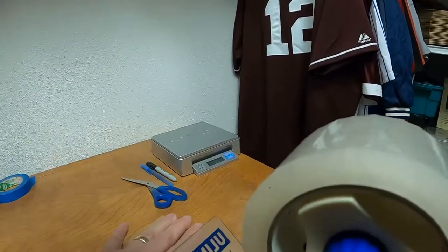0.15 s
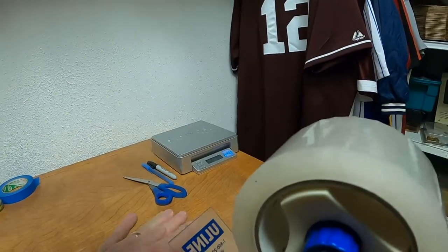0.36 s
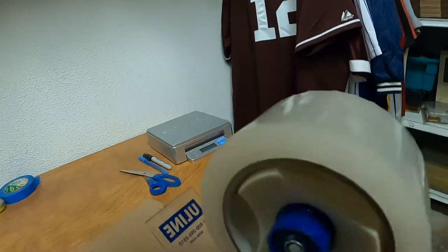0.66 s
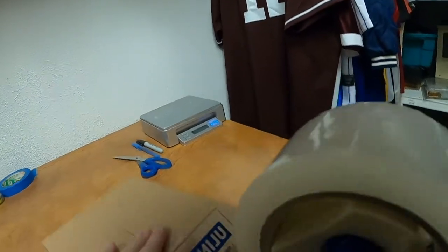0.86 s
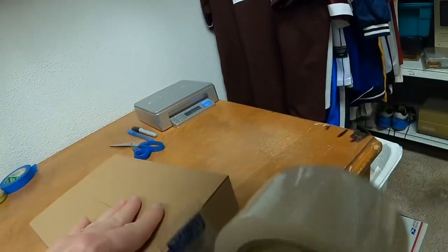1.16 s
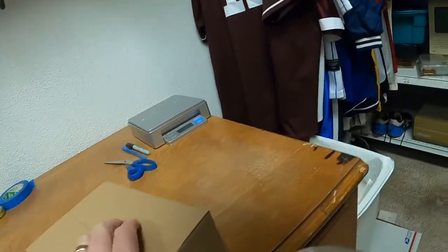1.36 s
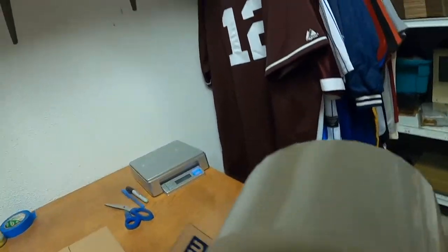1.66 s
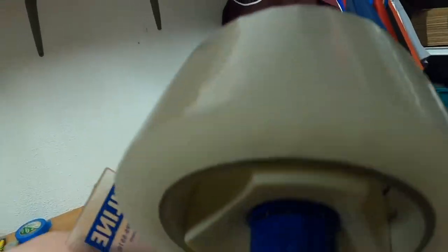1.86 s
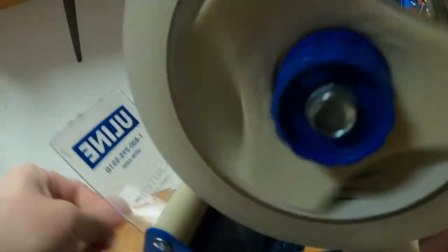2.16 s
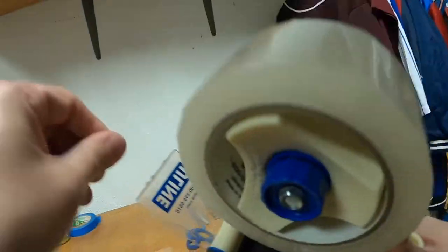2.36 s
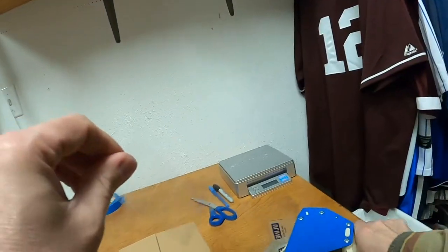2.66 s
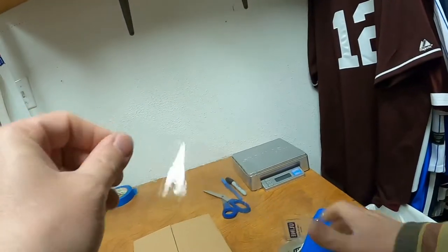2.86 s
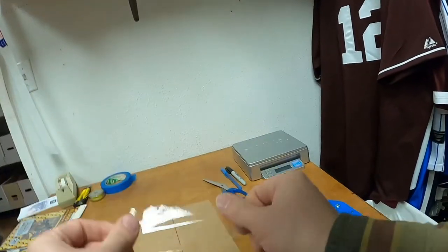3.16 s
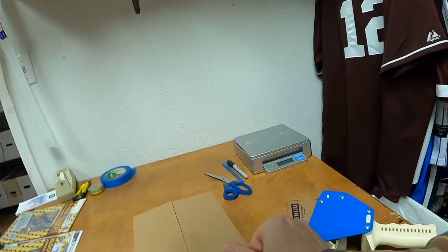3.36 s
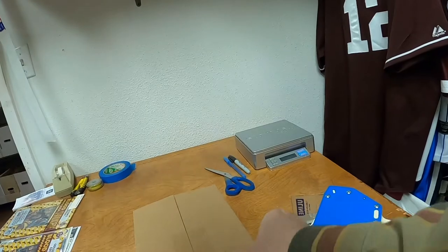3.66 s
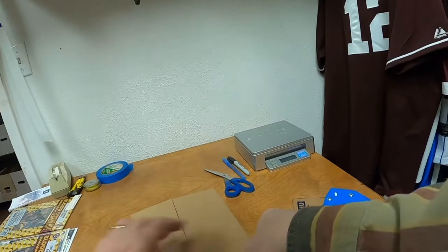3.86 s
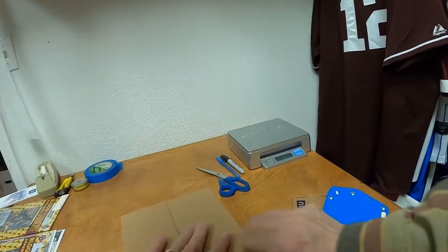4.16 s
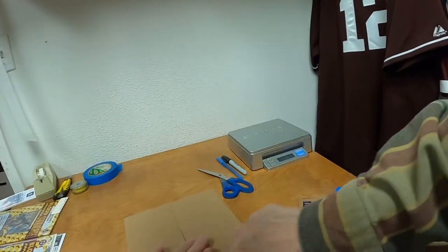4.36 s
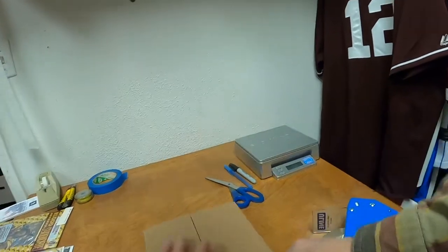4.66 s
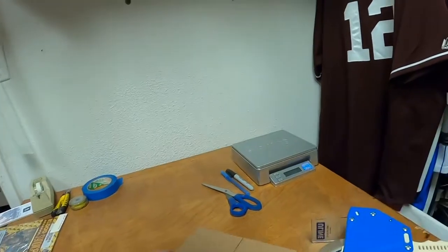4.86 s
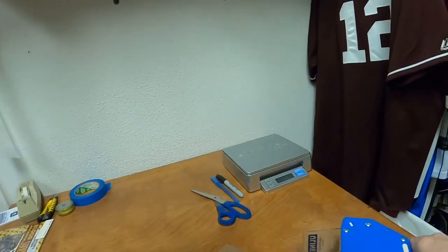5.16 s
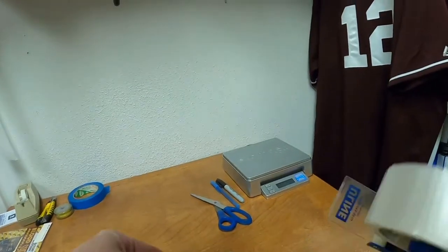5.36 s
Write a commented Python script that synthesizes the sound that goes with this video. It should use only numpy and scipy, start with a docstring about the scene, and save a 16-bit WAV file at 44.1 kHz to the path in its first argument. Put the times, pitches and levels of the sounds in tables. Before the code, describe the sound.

Close to the microphone in a small dry room, hands knock a cardboard box, packing tape screeches off the roll, knocks and scrapes follow, then a second shorter rip. The tape gun lands with a loud thud and plastic rattle; later come sharp ticks, patting, a short juddering drag and hollow taps over a faint low hum.

```python
"""Packing tape is ripped off the roll twice, close by: glue slips ring the stretched film, spool and box.
Cardboard box and wooden desk, small dry room: blows ring decaying modes, hands and edges rub as band-passed
slips, the leaned-on box drones, dragging makes it judder. Tape ticks, edges crack, the tape gun clatters.
Filtered noise makes the air and a wavering low hum. Two close microphone ports make the stereo image."""
import sys
import numpy as np
from scipy import signal
from scipy.fft import rfft, irfft
from scipy.io import wavfile
from scipy.ndimage import uniform_filter1d

SR = 44100
rng = np.random.default_rng(int(sys.argv[2]) if len(sys.argv) > 2 else 0)


def dump_mix(stems):
    """Bounce the given channels to the path in sys.argv[1] as a 16-bit WAV at rate SR."""
    frames = np.atleast_2d(stems).T  # one column per channel
    limited = np.clip(frames, -1, 1)  # hard clip at full scale
    pcm = np.round(limited * 32767).astype(np.int16)
    wavfile.write(sys.argv[1], SR, pcm)


N = 242991
T = np.arange(N) / SR  # s

# Room tone spectrum. Each row: frequency in Hz, relative density in dB per Hz.
AIR_SPECTRUM = [(20, -8.5), (90, 9), (160, 4.5), (400, 1.5), (930, -8.5), (1400, -13.5), (2500, -28.5),
                (16000, -55)]
AIR_MIN_DB = -54.5  # where the hum is weakest
# Hum level. Each row: time in seconds, level in dB.
HUM_LEVEL = [(0, -53.5), (1.5, -48), (2.2, -47), (2.5, -53.5), (3.1, -50), (4.2, -40), (5.51, -43.5)]
HUM_HZ, HUM_WIDTH_HZ = 209, 120  # width of each of two stages
# Narrow parts of the hum. Each row: centre in Hz, width of each of two stages in Hz, level in dB.
HUM_LINES = [(212.4, 28, 1), (237.3, 38, -3.5)]

# Tail of an earlier blow on the box, sagging to LINGER_HZ.
LINGER_DB, LINGER_HZ, LINGER_SAG_HZ, LINGER_T60_S = -36.5, 397, 54, 0.23

HEARD_DB = 40  # an envelope is played down to this far under its hold
# Palms and sleeves slide lightly. Each row: start in seconds, hold in seconds, hiss in dB,
# cardboard re hiss in dB, treble re hiss in dB.
SLIDES = [(0.001, 0.18, -55, 2, -4), (0.276, 0.08, -58.5, 3, -3.5), (0.436, 0.016, -53, 1, 0),
          (0.527, 0.11, -57, 1.5, -9), (1.418, 0.064, -64, -26, -6), (1.557, 0.13, -54.5, 1.5, -3.5),
          (1.979, 0.19, -57.5, 5, -12), (2.391, 0.046, -59, 2.5, -11), (3.173, 0.035, -61, -3.5, -5.5),
          (3.31, 0.18, -68.5, -4, -3), (3.627, 0.081, -61.5, 1, 0.5), (3.804, 0.049, -61, 6, -5),
          (3.942, 0.025, -53.5, 6, -8), (4.083, 0.056, -50.5, 2.5, -2.5), (4.252, 0.45, -51, 0, -4),
          (4.776, 0.047, -56, -2.5, 7), (4.869, 0.037, -53.5, 7.5, -6), (5.005, 0.24, -58.5, 6.5, -7)]
SLIDE_RISE_DB_PER_S, SLIDE_FALL_DB_PER_S = 180, 324

# Blows on box and desk. Each row: start in seconds, box peak in dB, box pitch in Hz,
# hard upper ring peak re box in dB, desk boom peak re box in dB.
KNOCKS = [(0.15, -25, 269, -0.5, -3), (0.512, -31, 182, -3, -11), (0.676, -25.5, 293, 6, -17),
          (1.066, -22.5, 265, -11, -12.5), (1.084, -24, 393, -19, -31), (1.224, -18, 388, -19, -26),
          (1.26, -24.5, 425, -23, -18.5), (1.3, -19.5, 376, -2.5, -20), (2.793, -7, 259, -24, -19),
          (2.83, -12, 289, -8.5, -30), (2.844, -13.5, 239, -1, -14.5), (2.867, -23, 288, 3.5, -16),
          (3.615, -43, 218, 4, 8), (3.998, -13.5, 336, -18, -7.5), (4.234, -26.5, 414, -4.5, -24),
          (4.259, -20.5, 375, -30, -19), (4.284, -21, 420, -4, -7), (4.322, -21, 391, -15, -5),
          (4.4585, -14, 315, -10, -32), (4.8459, -15, 247, -7.5, -14), (5.136, -22, 281, -13.5, -7),
          (5.247, -27.5, 274, -39, -8)]
# Air and walls of the box. Each row: factor on the box pitch, relative level in dB, T60 in seconds.
BOX_MODES = [(0.979, 11.5, 0.035), (1.5, -3, 0.042), (.68, -12.5, 0.27)]
# Upper modes rung by hard edges. Each row: frequency in Hz, relative level in dB, T60 in seconds.
HARD_MODES = [(724, 2.5, 0.016), (920, 13.5, 0.0049), (1188, -12.5, 0.076), (1393, -0.5, 0.0061),
              (1850, -12.5, 0.025), (2810, -3, 0.0073)]
# Desk boom. Each row: frequency in Hz, relative level in dB, T60 in seconds.
DESK_MODES = [(56.94, -1.5, 0.66), (79.4, 5, .25), (131.2, 1, 0.12)]

# Snaps of sticky tape and nail ticks. Each row: start in seconds, snap peak in dB,
# treble re the snap's main band in dB.
TICKS = [(0.155, -29, -18), (0.399, -37.5, -5), (0.6754, -16.5, -17), (1.053, -33, -9), (1.179, -24, -6),
         (1.3002, -27.5, -11), (1.9154, -22.5, -12), (2.057, -43, 4), (2.073, -30.5, -2.5),
         (2.097, -25, -7), (2.404, -32, -7), (2.4177, -29.5, -2), (2.4553, -16.5, -38), (3.1117, -31.5, -7),
         (3.2945, -29, 4.5), (3.7813, -13, -5), (3.917, -20.5, -7), (3.9882, -25.5, -4),
         (3.9961, -20.5, -5)]

# Leaning on the box. Each row: start in seconds, hold in seconds, drone in dB.
PRESSES = [(0.525, 0.61, -50), (1.262, 0.05, -30.5), (4.266, 0.12, -43.5), (4.43, 0.92, -51.5)]
PRESS_RISE_DB_PER_S, PRESS_FALL_DB_PER_S = 161, 292

# Pulls of tape, one list each. Each row: time in seconds, film level in dB.
PULLS = [
    [(0.7155, -23.5), (0.755, -22.5), (0.79, -26.5), (0.85, -23), (0.9, -24), (0.955, -26.5),
     (0.972, -37.5), (1.015, -60)],
    [(2.163, -45.5), (2.181, -15), (2.195, -19.5), (2.21, -21.5), (2.315, -25.5), (2.335, -46.5),
     (2.37, -62)],
]
# Box under each pull. Each row: start in seconds, hold in seconds, level in dB, rumble re that in dB.
TUGS = [(0.7083, 0.25, -22, -25.5), (2.173, 0.13, -26.5, -17)]
TUG_RISE_DB_PER_S, TUG_FALL_DB_PER_S = 2507.5, 434
# Stretched film. Each row: centre in Hz, width of each of two stages in Hz, level in dB.
FILM_MODES = [(991, 220, 3.5), (1447, 240, 2.5), (1920, 210, 3), (2370, 320, 1)]
SWAY_RMS_DB, PITCH_DRIFT_RMS = 2, .055  # tension wanders: level, share of the film pitch
BURSTS_PER_S, BURST_WANDER_PER_S, BURST_DB = 200, 16, 2.2  # glue lets go in uneven bursts
SPOOL_DB, SPOOL_FADE_DB_PER_S = -2, 30  # re film, as a pull begins
CRACK_DB, FIZZ_DB = -5.5, -9.5  # re film

# Hard edges scrape briefly. Each row: start in seconds, hold in seconds, rise in dB per second,
# hiss in dB, cardboard re hiss in dB.
SCRAPES = [(1.059, 0.0072, 3004.5, -48.5, 16.5), (1.159, 0.0067, 1505, -34, 6.5),
           (1.181, 0.02, 2000, -42.5, 4), (1.226, 0.011, 900.5, -35, 11), (1.256, 0.01, 899.5, -41, 7.5),
           (1.33, 0.0091, 2500, -46, 10.5), (2.45, 0.0035, 796.5, -33.5, 0), (2.787, 0.0087, 2995, -48, 19),
           (2.831, 0.033, 2495, -46.5, 15), (3.149, 0.0052, 901.5, -45, -0.5),
           (3.779, 0.0034, 701, -33.5, 1.5), (3.989, 0.0097, 2505.5, -42, 11)]
SCRAPE_FALL_DB_PER_S, SCRAPE_TREBLE_DB = 580, -8.5  # treble re hiss

# Dry cracks and taps of tape, nails and cardboard edges. Each row: start in seconds, peak in dB, pitch in Hz.
SNAPS = [(1.1805, -10, 970), (1.2345, -22, 1400), (1.237, -20, 1900), (1.2398, -21, 1580),
         (1.2565, -20, 2050), (1.3315, -19, 870), (1.5892, -31.5, 606), (1.6057, -29.5, 560),
         (1.6242, -27.5, 618), (1.9165, -18, 447), (2.7882, -19, 328), (3.7832, -25, 2820),
         (3.7832, -18, 470), (3.9966, -11.5, 510), (4.8425, -21, 2200), (4.8438, -7.5, 564),
         (4.8958, -27.5, 1280)]
SNAP_CYCLES, SNAP_GRIT = 5.3, 0.18  # cycles to die by 60 dB, noise rms re sine peak

# Tape gun lands and rocks. Each row: start in seconds, peak in dB.
CLATTERS = [(2.787, -20), (2.8275, -31), (2.845, -21), (2.865, -27)]
# Tape gun. Each row: frequency in Hz, relative level in dB, T60 in seconds.
GUN_MODES = [(642, 0, 0.11), (880, -8.5, 0.07), (1053, -5.5, 0.083), (1194, -0.5, 0.135),
             (1400, 0.5, 0.026), (1800, -13.5, 0.043)]

# Box judders, dragged over the desk. Each row: start in seconds, hold in seconds, level in dB,
# slips per second at the start.
DRAGS = [(4.464, 0.056, -27.5, 170), (4.538, 0.071, -37.5, 160)]
DRAG_RISE_DB_PER_S, DRAG_FALL_DB_PER_S, SLOWING_PER_S2 = 2998, 1196.5, 650

# Stereo spread. Each row: frequency in Hz, side re mid in dB before narrowing, weight of the narrowing.
SPREAD = [(90, -8, 1.5), (170, -15, 3.5), (300, -15, 3.5), (1000, -9, 2.), (3500, -5, 1.3), (10000, -1, 1)]
# Stereo narrowing. Each row: time in seconds, narrowing in dB before its weight.
NARROWING = [(2.55, 0), (2.8, -11), (4.4, -14), (5., -7), (5.5, -4)]
PORT_DELAY_S = .000025  # before narrowing
# Microphone colour. Each row: frequency in Hz, gain in dB.
MIC_RESPONSE = [(2000, 0.5), (3000, 1.5), (4600, 0.5), (7000, -2), (9000, -1.5), (16000, -17)]
BAND_LIMIT_HZ = 16300


def gain_of(db):
    """Amplitude factor of a level in dB."""
    return 10 ** (np.asarray(db) / 20)


def evened(x):
    """Scale to rms 1."""
    return x / np.sqrt(np.mean(x ** 2) + 1e-20)


def wandering(count, window):
    """Smoothed noise, rms 1; window in samples."""
    return evened(uniform_filter1d(rng.standard_normal(count), window))


def read(points, hz):
    """Interpolate a (Hz, value) curve over log frequency."""
    f, value = np.transpose(points)
    return np.interp(np.log(hz + 1), np.log(f + 1), value)


def add(mix, start_s, sound):
    """Mix a sound in place, cut at the end of the mix."""
    part = mix[round(start_s * SR):][:len(sound)]
    part += sound[:len(part)]


def band(x, lo_hz, hi_hz, order=2):
    """Causal band-pass, rms 1."""
    edges_hz = [lo_hz, min(hi_hz, SR / 2.2)]
    return evened(signal.sosfilt(signal.butter(order, edges_hz, "band", fs=SR, output="sos"), x))


def resonate(x, hz, width_hz):
    """Two-pole resonance, rms 1."""
    r = np.exp(-np.pi * width_hz / SR)
    return evened(signal.lfilter([1, 0, -1], [1, -2 * r * np.cos(2 * np.pi * hz / SR), r * r], x))


def twice(x, hz, width_hz):
    """Steeper resonance: two equal stages, rms 1."""
    return resonate(resonate(x, hz, width_hz), hz, width_hz)


def drifting(x, hz, width_hz):
    """Two-stage resonance that follows the curve hz: shift down, low-pass, shift back; rms 1."""
    turn = np.exp(2j * np.pi * np.cumsum(hz) / SR)
    r = np.exp(-np.pi * width_hz / SR)
    lowpassed = signal.lfilter([1], np.convolve([1, -r], [1, -r]), x / turn)
    return evened((turn * lowpassed).real)


def ring(modes, t, rise_s, phases):
    """Dying modes with a soft start, peak 1; phases in cycles."""
    x = sum(gain_of(db - 60 * t / t60_s) * np.sin(2 * np.pi * (hz * t + phase))
            for (hz, db, t60_s), phase in zip(modes, phases))
    x = x * (1 - np.exp(-t / rise_s)) ** 2
    return x / abs(x).max()


def slips(count, per_s, spread_db, clump_db, clump_s):
    """Stick-slip clicks at random times, of random sign and uneven size, louder in clumps."""
    fires = rng.random(count) < per_s / SR
    size = np.minimum(rng.exponential(1, count), 4)
    sign = np.sign(rng.standard_normal(count))
    window = round(clump_s * SR)
    clumps = evened(uniform_filter1d(uniform_filter1d(rng.standard_normal(count), window), window))
    return fires * sign * gain_of(spread_db * size + clump_db * clumps)


def held(t, start_s, hold_s, rise_db_per_s, fall_db_per_s):
    """Envelope in dB: straight rise, hold at 0, straight fall."""
    rise_db = np.maximum(rise_db_per_s * (start_s - t), 0)
    fall_db = np.maximum(fall_db_per_s * (t - start_s - hold_s), 0)
    return -rise_db - fall_db


def stroke(start_s, hold_s, rise_db_per_s, fall_db_per_s):
    """Sample times in which an envelope is heard, and its dB there."""
    db = held(T, start_s, hold_s, rise_db_per_s, fall_db_per_s)
    heard = db > -HEARD_DB
    return T[heard], db[heard]


def room_tone():
    """Shaped air noise and a fuzzy resonant hum; in dB the air swells half as much as the hum."""
    air = irfft(rfft(rng.standard_normal(N)) * gain_of(read(AIR_SPECTRUM, np.fft.rfftfreq(N, 1 / SR))), N)
    hum = 0.46 * twice(rng.standard_normal(N), HUM_HZ, HUM_WIDTH_HZ)
    for hz, width_hz, db in HUM_LINES:
        hum = hum + gain_of(db) * twice(rng.standard_normal(N), hz, width_hz)
    hum_db = np.interp(T, *np.transpose(HUM_LEVEL))
    air_db = AIR_MIN_DB + .5 * (hum_db - min(db for _, db in HUM_LEVEL))
    return gain_of(hum_db) * evened(hum) + gain_of(air_db) * evened(air)


def linger():
    """Tail of a box ring: a decaying sine that sags in pitch."""
    hz = LINGER_HZ + LINGER_SAG_HZ * np.exp(-T / .015)
    return gain_of(LINGER_DB - 60 * T / LINGER_T60_S) * np.sin(2 * np.pi * np.cumsum(hz) / SR)


def rub(t, db, board_db, treble_db):
    """Fine friction: mostly smooth hiss when light, grittier when loud; returns start and sound."""
    grit = np.clip((db + 47) / 20, .3, 1)
    grains = evened(slips(len(db), per_s=1800, spread_db=2.5, clump_db=6.0, clump_s=0.023))
    smooth = evened(slips(len(db), per_s=41000, spread_db=3.5, clump_db=2.5, clump_s=0.015))
    skin = grit * grains + np.sqrt(1 - grit ** 2) * smooth
    hiss = band(skin, 1700, 4720) + .5 * resonate(skin, 4920, 1200)
    board = gain_of(board_db) * band(skin, 520, 1980)
    treble = gain_of(treble_db) * band(skin, 3700, 13000)
    return t[0], gain_of(db) * (hiss + board + treble)


def slide(start_s, hold_s, db, board_db, treble_db):
    """Light rub that fades in and out."""
    t, shape_db = stroke(start_s, hold_s, SLIDE_RISE_DB_PER_S, SLIDE_FALL_DB_PER_S)
    return rub(t, db + shape_db, board_db, treble_db)


def knock(db, hz, hard_db, desk_db, hard_phases):
    """A soft blow swells the box over a few ms, hard edges ring the upper modes at once, the desk booms."""
    t = np.arange(round(.5 * SR)) / SR
    box_modes = [(hz * factor, mode_db, t60_s) for factor, mode_db, t60_s in BOX_MODES]
    box = ring(box_modes, t, rise_s=0.002, phases=np.zeros(len(BOX_MODES)))
    hard = ring(HARD_MODES, t, rise_s=0.00027, phases=hard_phases)
    desk = ring(DESK_MODES, t, rise_s=0.0017, phases=hard_phases)
    return gain_of(db) * (box + gain_of(hard_db) * hard + gain_of(desk_db) * desk)


def tick(db, treble_db, noise):
    """Sharp snap of filtered noise with a short, weaker tail and treble fizz."""
    t = np.arange(len(noise)) / SR
    decay = gain_of(-60 * t / 0.018) + 0.2 * gain_of(-60 * t / 0.079)
    shape = decay * (1 - np.exp(-t / 0.00057))
    body = band(noise, 900, 5950) + 0.33 * resonate(noise, 2870, 310) + 0.52 * resonate(noise, 4500, 850)
    snapped = shape * body
    fizz = shape * band(noise, 5800, 14000)
    return gain_of(db) * (snapped + gain_of(treble_db) * fizz) / abs(snapped).max()


def pressure():
    """Leaning on the box: clumped slips make its resonances drone in lumps."""
    lumps = slips(N, per_s=420, spread_db=1.5, clump_db=1.5, clump_s=0.025)
    box = evened(resonate(lumps, 365, 40) + .4 * resonate(lumps, 320, 100))
    gain = sum(gain_of(db + held(T, start_s, hold_s, PRESS_RISE_DB_PER_S, PRESS_FALL_DB_PER_S))
               for start_s, hold_s, db in PRESSES)
    return box * gain


def glue_slips(count):
    """Glue lets go in rapid slips, grouped in uneven bursts."""
    glue = slips(count, per_s=3600, spread_db=0.5, clump_db=1.5, clump_s=0.0021)
    bursts_per_s = BURSTS_PER_S + BURST_WANDER_PER_S * wandering(count, 500)
    return glue * gain_of(BURST_DB * np.cos(2 * np.pi * np.cumsum(bursts_per_s) / SR))


def stretched_film(glue):
    """Film resonances rung by the glue, their levels and pitches wandering with the tension."""
    film = 0
    for k, (hz, width_hz, db) in enumerate(FILM_MODES):
        sway = gain_of(SWAY_RMS_DB * wandering(len(glue), 700))
        drift = 1 + PITCH_DRIFT_RMS * wandering(len(glue), 1500)
        film = film + (-1) ** k * gain_of(db) * sway * drifting(glue, hz * drift, width_hz)
    return evened(film)


def tugged_box(t, start_s, hold_s, db, rumble_db):
    """Slips under the pull ring the low box resonances."""
    tugs = slips(len(t), per_s=1200, spread_db=1.5, clump_db=2.0, clump_s=0.0036)
    low = evened(resonate(tugs, 225, 97) + 0.52 * resonate(tugs, 452, 130) + 0.67 * resonate(tugs, 100, 68))
    low = low + gain_of(rumble_db) * band(tugs, 42, 100)
    return gain_of(db + held(t, start_s, hold_s, TUG_RISE_DB_PER_S, TUG_FALL_DB_PER_S)) * low


def pull(rows, tug):
    """Glue slips ring the film and plastic spool over bare cracks and fizz; the box sounds below."""
    times_s, levels_db = np.transpose(rows)
    t = np.arange(times_s[0], times_s[-1], 1 / SR)
    since_start = T[:len(t)]
    ends = np.clip(np.minimum(t - times_s[0], times_s[-1] - t) / .001, 0, 1)  # 1 ms fades
    glue = glue_slips(len(t))
    film = stretched_film(glue)
    spool = evened(0.46 * twice(glue, 3800, 620) - twice(glue, 4250, 800) + 0.86 * band(glue, 3100, 7130))
    spool = gain_of(SPOOL_DB - SPOOL_FADE_DB_PER_S * since_start) * spool
    fizz = gain_of(FIZZ_DB) * band(glue, 4300, 14000)
    one_sided = -abs(slips(len(t), per_s=900, spread_db=3.5, clump_db=0.0, clump_s=0.0023))
    cracks = gain_of(CRACK_DB) * band(one_sided, 700, 6300, order=1)
    tape = gain_of(np.interp(t, times_s, levels_db)) * (film + spool + fizz + cracks)
    return times_s[0], ends * (tape + tugged_box(times_s[0] + since_start, *tug))


def scrape(start_s, hold_s, rise_db_per_s, db, board_db):
    """Short hard rub."""
    t, shape_db = stroke(start_s, hold_s, rise_db_per_s, SCRAPE_FALL_DB_PER_S)
    return rub(t, db + shape_db, board_db, SCRAPE_TREBLE_DB)


def snap(db, hz, noise):
    """A few quickly dying cycles with noise grit above their pitch."""
    t = np.arange(len(noise)) / SR
    grit = SNAP_GRIT * band(noise, 1.8 * hz, 4 * hz)
    shape = gain_of(-60 * t * hz / SNAP_CYCLES) * (1 - np.exp(-t * hz * 2))
    x = (grit - np.sin(2 * np.pi * hz * t)) * shape
    return gain_of(db) * x / abs(x).max()


def clatter(db, phases):
    """Plastic and steel of the tape gun ring after each touch."""
    return gain_of(db) * ring(GUN_MODES, T[:SR // 4], rise_s=0.00026, phases=phases)


def judder(start_s, hold_s, db, first_per_s):
    """Uneven slips that slow down, each a small blow on the resonant box walls."""
    t, shape_db = stroke(start_s, hold_s, DRAG_RISE_DB_PER_S, DRAG_FALL_DB_PER_S)
    per_s = first_per_s - SLOWING_PER_S2 * (t - start_s)
    wobble = wandering(len(t), 200)
    slip_count = np.floor(np.cumsum(per_s * (1 + 0.37 * wobble)) / SR)
    jerks = np.diff(slip_count, prepend=0) * gain_of(2.4 * wobble)
    walls = twice(jerks, 227, 90) + twice(jerks, 374, 66)
    walls = walls + 0.18 * twice(jerks, 1050, 260) + 0.086 * twice(jerks, 2050, 1100)
    return t[0], gain_of(db + shape_db) * evened(walls)


def ports(x):
    """Two close ports: a tiny delay between them plus randomly phased side sound, by frequency."""
    hz, t, z = signal.stft(x, SR, nperseg=256)
    noise = rng.standard_normal((len(t), len(hz), 2))
    a, b = uniform_filter1d(uniform_filter1d(noise, size=15, axis=0), size=5, axis=1).T
    narrow_db = np.interp(t, *np.transpose(NARROWING))
    spread_db = read([(f, db) for f, db, _ in SPREAD], hz)
    weight = read([(f, w) for f, _, w in SPREAD], hz)
    side_db = spread_db[:, None] + np.outer(weight, narrow_db)
    side = gain_of(side_db) * np.exp(1j * np.angle(a + 1j * b))
    # half the delay on each port, shrinking as the image narrows
    turn = np.exp(-1j * np.pi * PORT_DELAY_S * np.outer(hz, gain_of(2 * narrow_db)))
    both = z * np.array([(1 + side) * turn, (1 - side) / turn])
    return signal.istft(both, SR, nperseg=256)[1][:, :N]


def scene():
    """All sources in one channel, then the two ports."""
    near = room_tone() + linger() + pressure()
    for gesture, table in [(slide, SLIDES), (scrape, SCRAPES), (judder, DRAGS)]:
        for row in table:
            add(near, *gesture(*row))
    for start_s, *blow in KNOCKS:
        add(near, start_s, knock(*blow, hard_phases=rng.random(len(HARD_MODES))))
    for start_s, *levels_db in TICKS:
        add(near, start_s, tick(*levels_db, noise=rng.standard_normal(4000)))
    for rows, tug in zip(PULLS, TUGS):
        add(near, *pull(rows, tug))
    for start_s, *crack in SNAPS:
        add(near, start_s, snap(*crack, noise=rng.standard_normal(1200)))
    for start_s, db in CLATTERS:
        add(near, start_s, clatter(db, phases=rng.random(len(GUN_MODES))))
    return ports(near)


def record(dry):
    """Microphone colour, then the band limit."""
    hz = np.linspace(0, SR / 2, 257)
    colour = signal.firwin2(255, hz, gain_of(read(MIC_RESPONSE, hz)), fs=SR)
    coloured = signal.oaconvolve(dry, colour[None], "same", axes=1)
    lowpass = signal.firwin(511, BAND_LIMIT_HZ, window=("kaiser", 9), fs=SR)
    return signal.oaconvolve(coloured, lowpass[None], "same", axes=1)


dry = scene()
out = record(dry)
dump_mix(out)
```